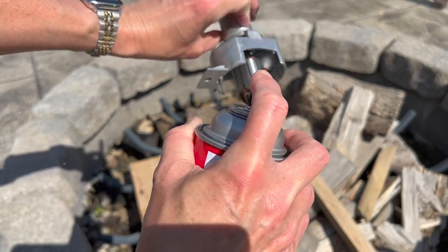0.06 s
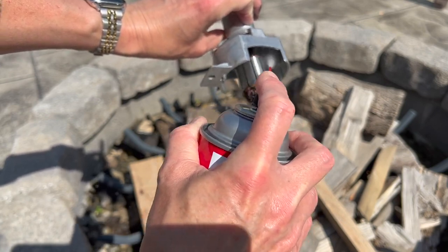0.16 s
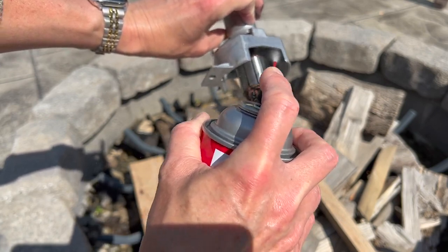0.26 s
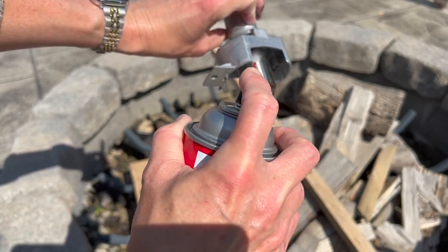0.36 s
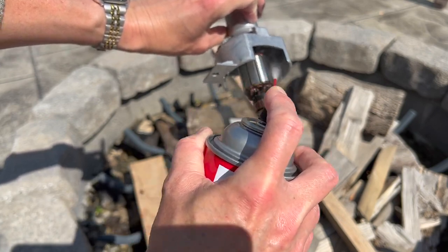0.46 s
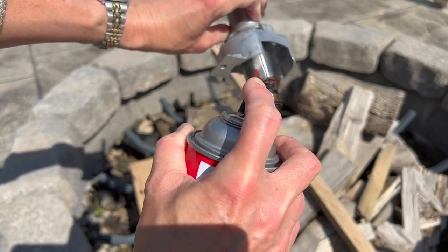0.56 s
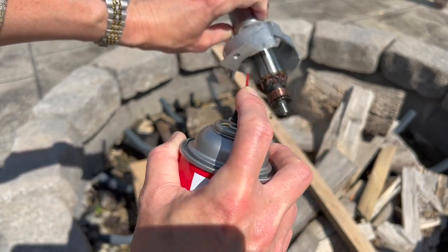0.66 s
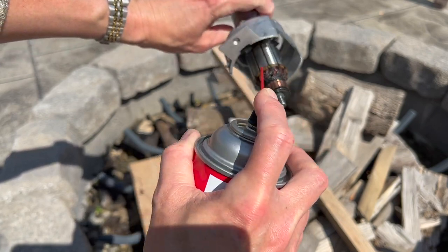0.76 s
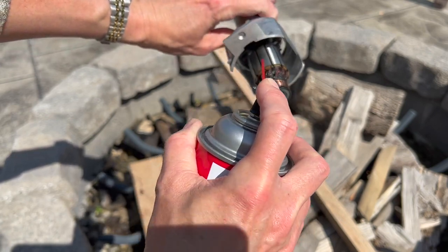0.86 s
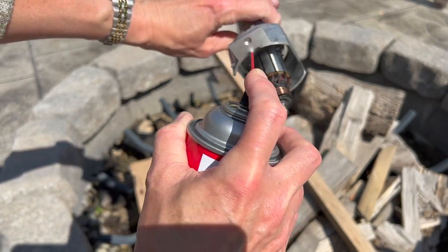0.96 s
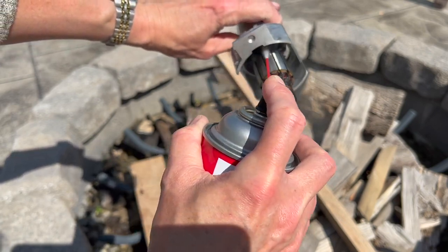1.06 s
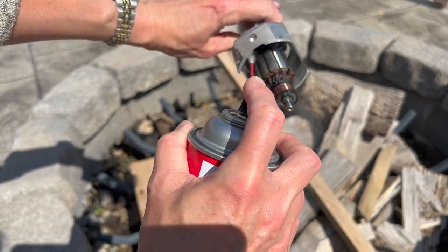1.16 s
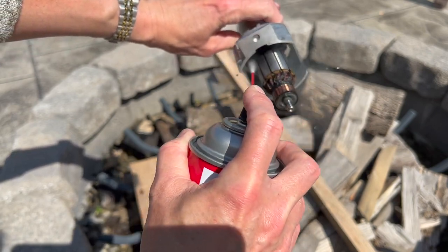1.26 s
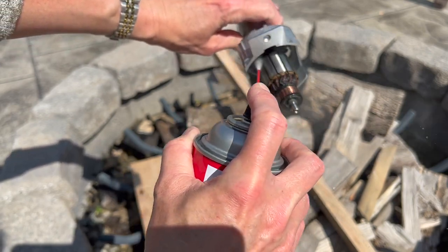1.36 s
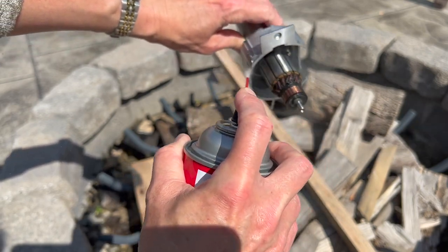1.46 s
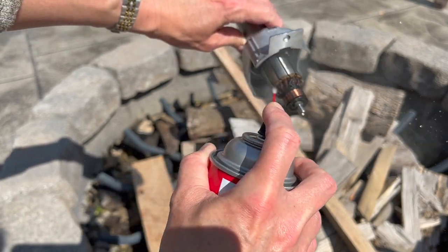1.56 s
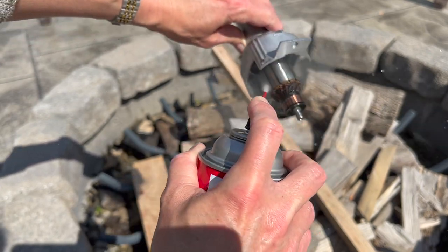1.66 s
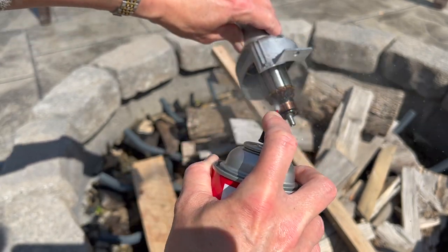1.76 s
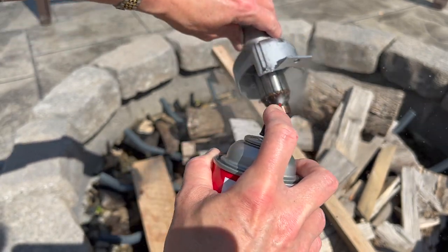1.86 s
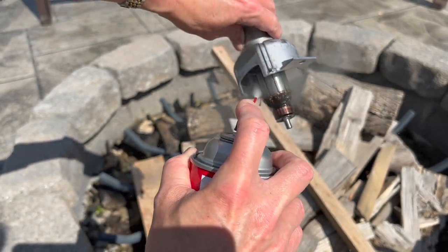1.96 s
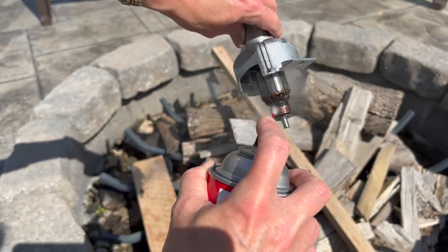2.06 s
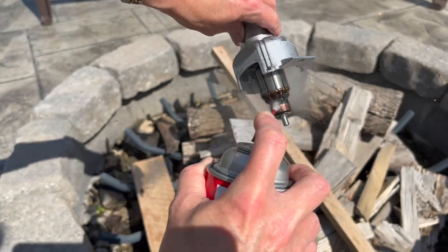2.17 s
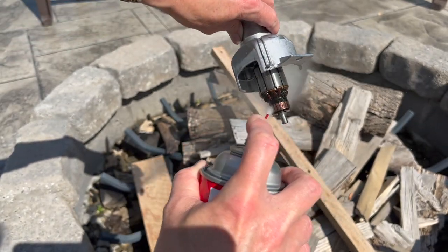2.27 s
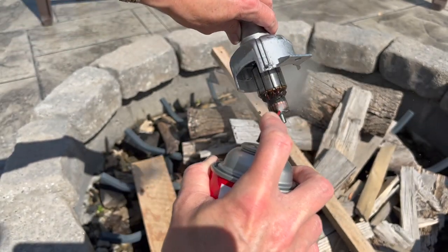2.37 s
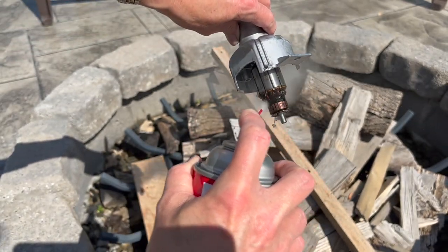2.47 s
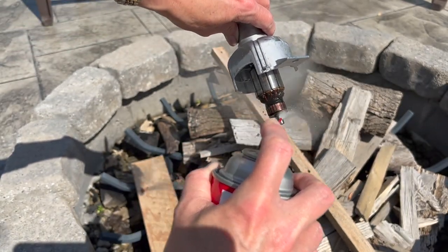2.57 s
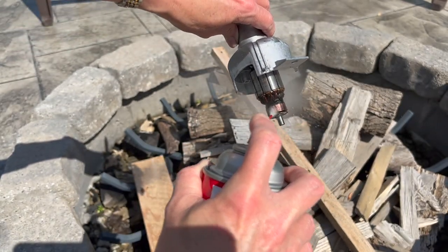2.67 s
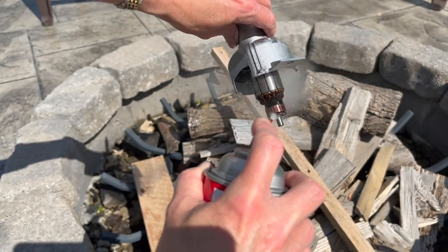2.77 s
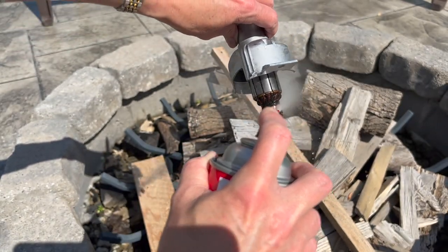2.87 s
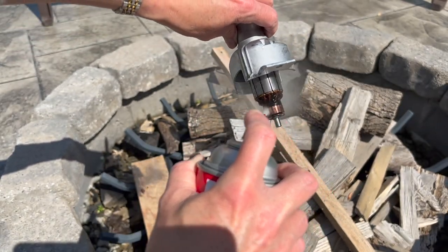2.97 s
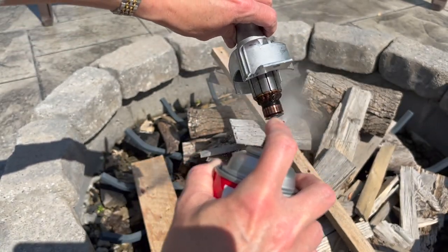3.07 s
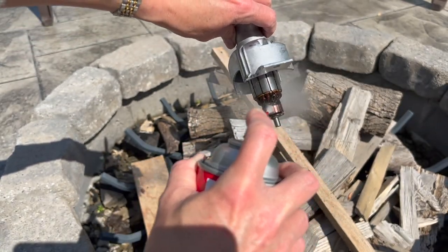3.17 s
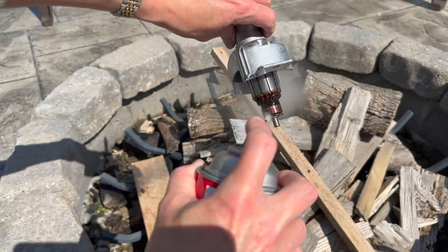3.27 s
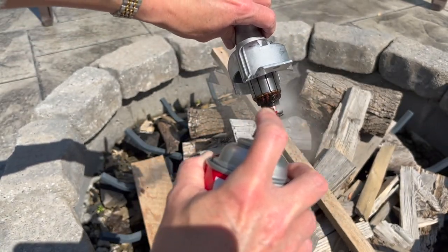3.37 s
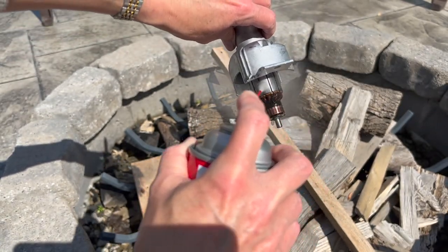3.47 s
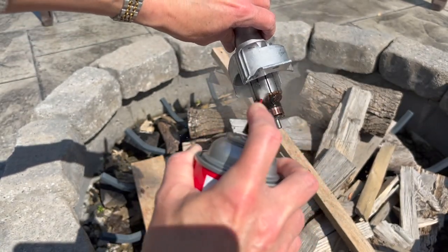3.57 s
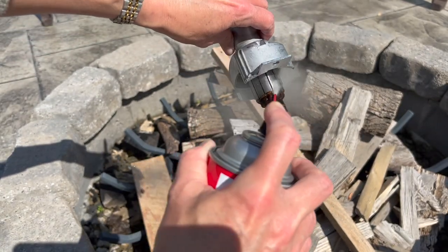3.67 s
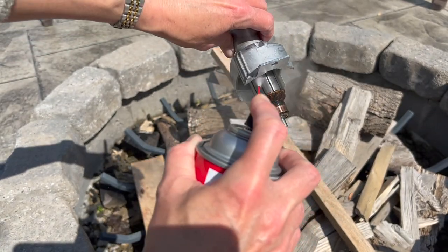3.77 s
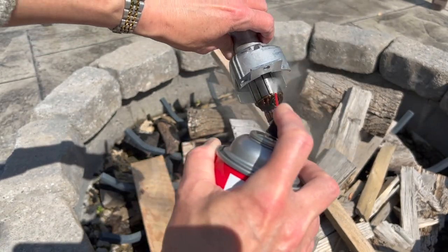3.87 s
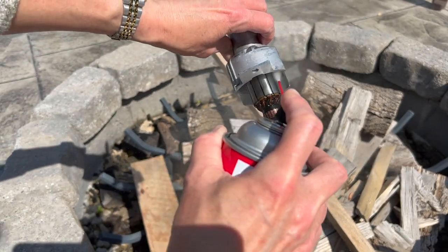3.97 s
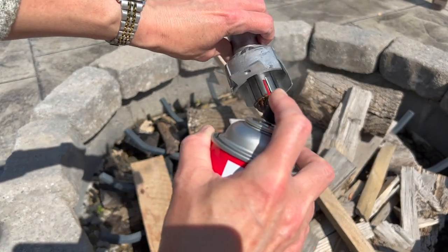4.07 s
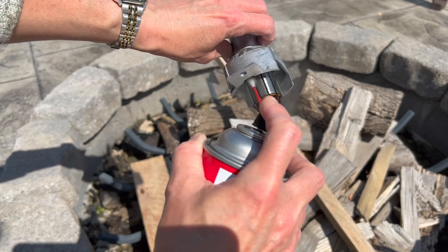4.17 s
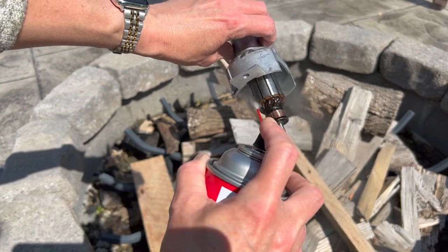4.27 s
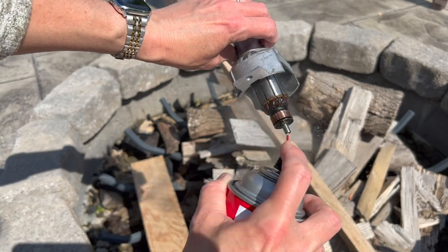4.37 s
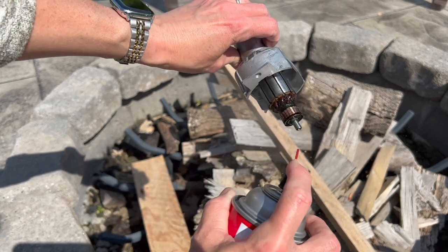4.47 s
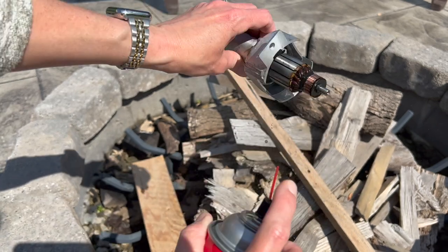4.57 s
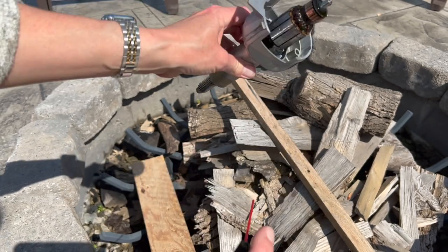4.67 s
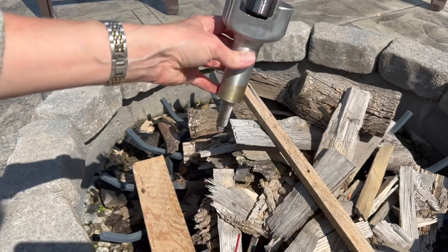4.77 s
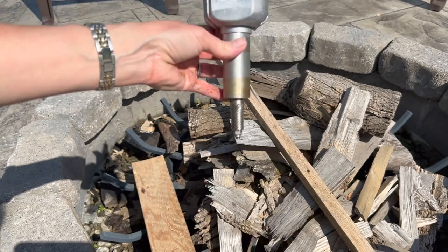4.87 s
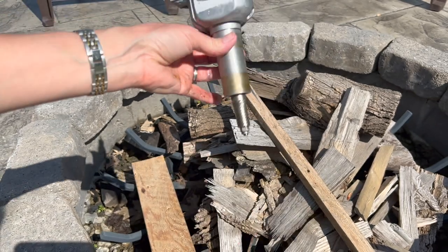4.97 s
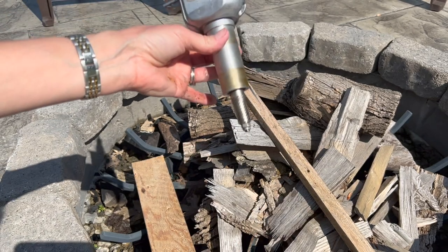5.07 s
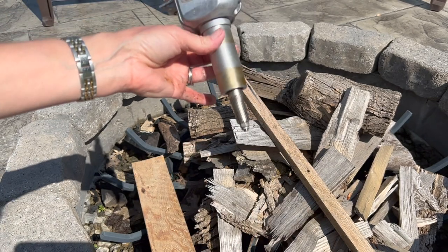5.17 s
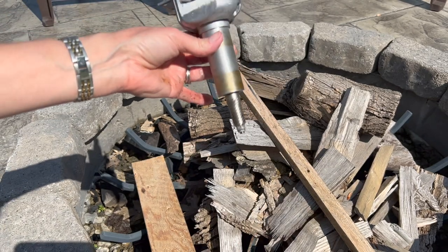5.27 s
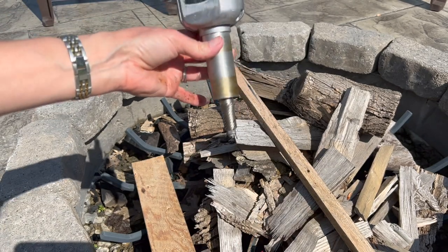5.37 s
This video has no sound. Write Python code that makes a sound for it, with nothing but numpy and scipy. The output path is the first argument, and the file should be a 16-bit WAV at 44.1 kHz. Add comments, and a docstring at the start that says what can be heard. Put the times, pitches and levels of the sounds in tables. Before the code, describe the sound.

Close outdoor stereo sound of an aerosol jet hitting a small hollow metal part. From 0 to 0.7 s a moderate bright hiss with wet splash, flickering with a bottle-like hoot near 900 Hz and airy whistles around 7 kHz. It cuts quickly; a faint metallic ring and several tiny plastic ticks fill the gap from 0.8 to 0.92 s. At about 0.95 s the spray returns suddenly, loudest, spitting liquid, with breathy pocket tones until 1.6 s and heavy low air thumps at 1.1-1.35 s. It eases into a thinner, steadier hiss through 3.4 s, with a brief bird warble near 2.65 s and softer thumps around 3.05 s. Hollow tones strengthen again around 4 s. The valve shuts at 4.4 s; a clear cap tick at 4.5 s and a short gas spit at 4.6 s follow. Quiet low rumble remains, with quick gliding bird warbles at 4.73 and 5.3 s, lightly echoed by stone.

```python
"""Aerosol spray on a motor part

An aerosol can sprays a small motor part over a stone fire pit, close by: a short burst, a pause, a long burst.
One flow drives shaped noise for hiss and splash, and ringing noise bands for the hollow housing, blown like a bottle.
The can rings, ticks and spits; puffs of air thump the microphone as short low swings.
A small bird warbles nearby in gliding tones, over a low outdoor rumble of filtered noise."""
import sys
import numpy as np
from scipy import signal
from scipy.fft import rfft, irfft, next_fast_len
from scipy.io import wavfile
from scipy.ndimage import uniform_filter1d, minimum_filter1d, map_coordinates

SR = 44100
rng = np.random.default_rng(int(sys.argv[2]) if len(sys.argv) > 2 else 0)


def digitize_waveform(pressure):
    """Quantize a signal to 16-bit integers and store it at the path in sys.argv[1].

    Rows of a 2-D input are taken as channels; values are limited to [-1, 1].
    """
    field = np.atleast_2d(pressure).T
    bounded = np.clip(field, -1, 1)
    quanta = np.round(bounded * 32767).astype(np.int16)
    wavfile.write(sys.argv[1], SR, quanta)


def field_ratio(decibels):
    """Amplitude ratio for a level in dB (20 dB per decade); scalars and array-likes work."""
    return 10 ** (np.asarray(decibels, dtype=float) / 20)


N = 239022
T = np.arange(N) / SR  # seconds

# The hand's slow control of the jet. Each row: time in seconds, flow in dB,
# how squarely the jet meets the metal in dB, hollow note in Hz as the part is turned.
AIM_PATH = [(0, -32.5, 3, 912), (.3, -30.5, 3.5, 929), (0.599, -31, 1.5, 910), (0.677, -37.5, 5.5, 900),
            (.7, -45.5, 4, 898), (1.0, -22.5, -3.5, 911.5), (1.3, -25.5, -2, 873), (1.55, -27, -0.5, 879),
            (1.85, -28, 0, 880), (2.1, -30, 3, 880), (2.7, -32, 4, 888), (3.4, -32.5, 4.5, 900),
            (3.5, -29.5, 2.5, 887), (3.88, -29, 1.5, 900), (3.95, -34, 7.5, 915), (4.05, -28.5, 2, 911),
            (4.301, -30, 1.5, 900), (4.39, -34.5, 3, 900)]
# Sputters as slugs of liquid leave the straw. Each row: peak time in seconds, extra flow in dB,
# length in seconds that scales the rise and the fall.
LIQUID_SLUGS = [(0.954, 5, .006), (0.997, 5, .005), (1.007, 4, .004), (1.034, 6, 0.0065), (1.399, 7, 0.008),
                (1.465, 6.5, 0.0037), (1.588, 3.5, 0.011), (1.76, 3.5, 0.018), (2.03, 1.5, .015),
                (2.576, 4, 0.016), (4.274, 3.5, 0.0052)]
# The jet glances off an edge. Each row: middle in seconds, half length in seconds, rise of the hiss in dB,
# relative whistle level in dB, whistle pitch in Hz.
EDGE_GLANCES = [(.13, .03, 2.5, -8.5, 7300), (.43, 0.021, 7.5, 3.5, 7800), (.56, 0.038, 3, 2, 7650),
                (1.007, .009, 4, 15.5, 6440), (1.12, 0.055, 1.5, -2.5, 7200), (1.23, 0.054, 0, 1.5, 7224),
                (1.36, .03, 2.5, 4, 6770), (1.43, .015, 2.5, -9.5, 7220), (1.6, 0.017, 8.5, 5.5, 7400),
                (1.655, 0.025, 8, 0.5, 7800), (1.91, 0.016, 7, 1.5, 7140), (1.95, 0.015, 7.5, 0.5, 7600),
                (2.33, 0.027, 2.5, -21.5, 7450), (2.56, 0.011, 3, -5.5, 7400), (2.8, 0.018, 7, -10, 6690),
                (3.02, .012, 5, -12.5, 7800), (3.31, 0.026, 5.5, -13, 6910), (3.52, .055, 3.5, 7.5, 7700),
                (3.59, 0.012, 3.5, -2.5, 7400), (3.79, 0.04, 2, 4, 7680), (3.86, 0.031, 3.5, 4, 7740),
                (4.11, 0.047, 5, -5, 7090), (4.18, 0.013, 3.5, 7, 7860), (4.28, 0.018, 3.5, 5.5, 6820),
                (4.36, 0.016, 3.5, -6.5, 7650)]
# The jet blows across an opening. Each row: middle in seconds, half length in seconds,
# then relative levels in dB of the hollow note, the large pockets and the small pockets.
BLOWN_OPENINGS = [(0, 0.034, 5.5, 4.5, 5.5), (.14, 0.093, 5.5, 2, -7), (.325, 0.028, 15.5, 12.5, 6.5),
                  (.37, 0.022, 5.5, -3, 9), (.49, 0.022, 7.5, 3.5, -2), (1.04, 0.029, 6.5, 1.5, 10),
                  (1.13, 0.047, 8, 5, 6), (1.2, 0.026, 0.5, 5.5, 16.5), (1.27, .035, 15, 10, 13.5),
                  (1.4, 0.02, 9.5, 11.5, 10.5), (1.46, 0.014, 9, 12.5, 8), (1.51, 0.023, 11.5, 16, 12.5),
                  (1.55, 0.014, 10, 4.5, 4.5), (1.74, 0.03, 5, 5, 6.5), (2.05, 0.02, 2.5, 6, 8.5),
                  (2.8, 0.014, -15, 2, 8), (3.05, 0.014, -10, -7, 9.5), (3.33, 0.035, -2, -1.5, 9.5),
                  (3.55, 0.028, 2, -13, 2.5), (3.78, 0.022, 2.5, 9, 6.5), (3.85, 0.046, 4.5, -11, -4.5),
                  (3.96, 0.028, 11.5, 1, 1), (4.015, 0.027, 16.5, 9, 2), (4.07, 0.045, 6.5, 8, 9),
                  (4.22, .04, 10, 5, 1), (4.3, 0.047, 2.5, -5.5, 8)]
# Between passes: relative levels in dB of the hollow note, large pockets, small pockets and whistle.
IDLE_LEVELS = [-10.5, -3.5, -1.5, -10]
# Colour of the hissing jet. Each row: frequency in Hz, relative density in dB.
JET_COLOUR = [(1500, -34), (3000, -5.5), (4400, -8), (5000, -11.5), (5800, -4), (7000, -6.5), (9000, -4.5),
              (12000, -1), (15000, -2), (15700, 1.5), (15900, -29.5)]
# Colour of the splash. Each row: frequency in Hz, relative density in dB.
SPLASH_COLOUR = [(120, -33.5), (220, -9), (400, -4), (700, 0), (1250, -6), (1600, -6), (2500, -10),
                 (4000, -8.5), (6000, -30)]
# Resonances of the wetted metal that colour the splash. Each row: centre in Hz, width in Hz, level in dB.
METAL_MODES = [(740, 110, -12.5), (1227, 300, 3.5), (2500, 180, 1), (2850, 200, -5), (3300, 300, -8),
               (4770, 260, 6.5)]
# Resonances of the large pockets of the housing. Each row: centre in Hz, width in Hz, relative level in dB.
LARGE_POCKETS = [(1410, 680, -10.5), (1890, 330, 1), (2114, 190, 2.5), (2487, 247, 1.5), (2970, 680, -4.5),
                 (5160, 150, -12)]
# Resonances of the small pockets. Each row: centre in Hz, width in Hz, relative level in dB.
SMALL_POCKETS = [(2426, 450, -3), (2830, 560, -1), (3814, 480, 0), (4280, 100, -3), (5060, 300, -5.5)]
# Stereo likeness of the spray noise. Each row: frequency in Hz, left-right correlation from 0 to 1.
SPRAY_LIKENESS = [(100, .92), (600, .92), (1600, .85), (2200, .96), (2900, .96), (4400, .82), (5700, .5),
                  (6600, .97), (9000, .99), (11500, .99), (14000, .93)]
# The can's shell rings on. Each row: start in seconds, pitch in Hz, starting level in dB, t60 in seconds.
SHELL_RINGS = [(.705, 2150, -59, 1.5), (.705, 12050, -64, .6), (4.4, 2150, -64, 1.2)]
# The plastic cap ticks. Each row: start in seconds, level in dB, lower pitch in Hz.
CAP_TICKS = [(0.804, -43, 2000), (0.8631, -46, 2352), (0.8887, -43, 1620), (0.913, -39, 2650),
             (4.4918, -30, 2505)]
# Left-over gas spits from the straw. Each row: start in seconds, starting level in dB, t60 in seconds.
GAS_SPITS = [(4.5985, -46, .09), (.912, -62, .1)]
# Puffs of air on the microphone. Each row: middle in seconds, level in dB, pitch at the middle in Hz,
# spread in seconds.
AIR_PUFFS = [(1.09, -22, 45, 0.012), (1.126, -16.5, 105, 0.0046), (1.156, -8, 67.1, 0.0096),
             (1.283, -14.5, 77.6, 0.0079), (1.335, -18, 112.4, 0.0046), (1.497, -28, 70, 0.012),
             (3.048, -16.5, 115, 0.0034), (3.094, -16, 81.5, 0.0076), (3.313, -31.5, 59.3, 0.016),
             (4.944, -40, 55.5, 0.017)]
# When the bird sings. Each row: time in seconds, gain in dB, fading through the warble in dB per second.
WARBLE_TIMES = [(2.639, 11, 50), (4.727, 2, 0), (5.3, 0, 0)]
# One warble, two voices overlapping. Each row: start and end in seconds from the warble's time,
# first, middle and last pitch in Hz, relative level in dB.
WARBLE_NOTES = [(-.026, -.003, 7200, 6800, 6300, -60), (-.014, -.004, 3700, 3900, 4100, -50),
                (-.003, .001, 2500, 3000, 3600, -54), (.001, .021, 3600, 4150, 4650, -40),
                (.005, .026, 4600, 4700, 4750, -41), (.023, .048, 4200, 3700, 3100, -37),
                (.038, .052, 3850, 4200, 4000, -43), (.052, .071, 2950, 2980, 3100, -31),
                (.07, .084, 3200, 3500, 3950, -40), (.08, .095, 3600, 3150, 2950, -38),
                (.095, .109, 3200, 2350, 2950, -35), (.11, .124, 2450, 2650, 3000, -50)]
# Early echoes off stone. Each row: delay in seconds, relative level in dB.
STONE_ECHOES = [(.0023, -17), (.0041, -14), (.0068, -16), (.0105, -22), (.016, -15), (.083, -17)]
# Tail of the yard. Each row: frequency in Hz, t60 in seconds.
YARD_DECAY = [(500, 0.78), (2400, .5), (3300, 0.83), (4500, 1.6), (6500, .5), (9000, .2)]
# Colour of the far rumble and hiss. Each row: frequency in Hz, relative density in dB.
AIR_COLOUR = [(15, -45.5), (30, -18), (60, 0), (120, -6), (250, -12.5), (624, -19), (1000, -25),
              (1890, -37), (3620, -43), (5880, -47.5), (7200, -46.5), (9500, -50.5), (12000, -48.5),
              (15700, -55.5), (15900, -92)]
# Stereo likeness of the far sound. Each row: frequency in Hz, left-right correlation from 0 to 1.
AIR_LIKENESS = [(60, .94), (200, .8), (400, .4), (800, 0), (1400, 0), (2400, .7), (6000, .75), (9000, .97)]
# The two microphone ports. Each row: frequency in Hz, lead of left in radians, left over right in dB.
MIC_PORTS = [(0, -.5, .4), (200, -.5, .3), (450, -.3, 1.5), (850, .6, -4.5), (1200, .5, 2), (1550, -.5, 1),
             (2200, .1, 0), (2900, .3, 0), (3600, 1.1, .5), (4650, 1.1, .5), (5340, 0, 1), (5700, -2.5, 1),
             (6500, -6.2, 0), (8250, -6.4, 0), (9150, -9.3, 0), (10600, -9.5, 0), (12600, -12.45, 0),
             (14500, -12.65, 0), (15800, -15.3, 0)]

FIRST_SHUT_S, FIRST_T60_S = .7, .045  # the valve shuts, the flow dies
REOPEN_S, LEAK_DB, OPENING_S = .93, -33, 0.018  # pressed again, flow at first touch, time constant of its rise
LAST_SHUT_S, LAST_T60_S = 4.395, .025
IDLE_WHISTLE_HZ = 7400  # between passes
SQUARENESS = 2.6  # 2 = round pass, more = flat top
GLANCE_STEALS, OPENING_ADDS = 0.23, 0.17  # dB of splash lost per dB of hiss, gained per dB of large-pocket ring
AIR_DB = -40
TOP_HZ = 15800  # top of the microphone's range


def unit(x):
    """Scaled to rms 1."""
    return x / np.sqrt(np.mean(x ** 2) + 1e-20)


def along(points, hz):
    """(Hz, value) points read on a log axis."""
    f, v = np.transpose(points)
    return np.interp(np.log(hz + 1), np.log(f + 1), v)


def wobble(rate):
    """A smooth random curve, rate knots a second."""
    return map_coordinates(rng.standard_normal(int(N * rate / SR) + 4), [T * rate])


def filtered(x, response):
    """x passed through a complex response of frequency."""
    m = next_fast_len(N + 8192)
    spectrum = rfft(x, m) * response(np.fft.rfftfreq(m, 1 / SR))
    return irfft(spectrum, m)[..., :N]


def modes(table):
    """Response of a set of (Hz, width, dB) resonances, with alternating signs."""
    def response(f):
        total = 0
        for k, (centre, width, db) in enumerate(table):
            damping = 1j * f * width
            total = total + (-1) ** k * field_ratio(db) * damping / (centre * centre - f * f + damping)
        return total
    return response


def rush(response, alike, patchy_db):
    """Turbulence: stereo noise of rms 1 with time-frequency patches of random gain."""
    z = signal.stft(rng.standard_normal((2, N)), nperseg=256)[2]
    field = rng.standard_normal(z.shape[1:])
    field = uniform_filter1d(uniform_filter1d(field, size=5, axis=0), size=10, axis=1)
    pair = signal.istft(z * field_ratio(patchy_db * unit(field)), nperseg=256)[1][:, :N]

    def spread(hz):
        angle = np.arccos(np.clip(along(alike, hz), -1, 1)) / 2
        return response(hz) * [np.cos(angle), np.sin(angle)]

    mid, side = filtered(pair, spread)
    return unit(np.array([mid + side, mid - side]))


def band(centre_hz, width_hz):
    """A breathy tone: narrow noise of rms 1 around a moving pitch."""
    slow = filtered(rng.standard_normal((2, N)), lambda f: 1 / (1 + 1j * f / width_hz) ** 2)
    phase = 2 * np.pi * np.cumsum(centre_hz) / SR
    return unit(slow[0] * np.cos(phase) + slow[1] * np.sin(phase))


def passes(table):
    """One swell from 0 to 1 and back for each row, on a coarse clock, and the row's other columns."""
    middle, half, *cols = np.transpose(table)
    distance = np.abs((T[::64] - middle[:, None]) / half[:, None])
    return np.exp(-.5 * distance ** SQUARENESS), cols


def fine(coarse):
    """A coarse control curve read at every sample."""
    return np.interp(T, T[::64], coarse)


def jet_flow(flow_db):
    """Flow through the straw: the hand's curve, the valve, slugs of liquid and a random flutter."""
    slugs_db = 0
    for at, db, length in LIQUID_SLUGS:
        # a slug arrives suddenly and thins out more slowly
        spread = np.where(T < at, 0.22 * length, 0.65 * length)
        slugs_db = slugs_db + db * np.exp(-.5 * ((T - at) / spread) ** 2)
    # the flow collapses within a few hundredths of a second when the finger lifts
    first_shut_db = -60 * np.maximum(T - FIRST_SHUT_S, 0) / FIRST_T60_S
    last_shut_db = -60 * np.maximum(T - LAST_SHUT_S, 0) / LAST_T60_S
    opening_db = LEAK_DB * np.exp(-np.maximum(T - REOPEN_S, 0) / OPENING_S)
    valve_db = np.where(T < REOPEN_S, first_shut_db, last_shut_db + opening_db)
    flutter_db = 1.1 * wobble(24.77) + 0.45 * wobble(300)
    return field_ratio(flow_db + valve_db + slugs_db + flutter_db)


def spray():
    """One flow drives the hiss, the splash and the resonances of the part it strikes."""
    s, *cols = np.transpose(AIM_PATH)
    flow_db, square_db, hollow_hz = (np.interp(T, s, c) for c in cols)
    glance, (rise_db, whistle_db, whistle_hz) = passes(EDGE_GLANCES)
    blown, ring_db = passes(BLOWN_OPENINGS)

    hollow_gain, deep_gain, high_gain = (
        fine(field_ratio(idle) + field_ratio(db) @ blown) for idle, db in zip(IDLE_LEVELS, ring_db))
    edge_gain = fine(field_ratio(IDLE_LEVELS[-1]) + field_ratio(whistle_db) @ glance)
    hiss_db = fine(rise_db @ glance)
    # the idle pitch has a small weight, so a glance takes the whistle over
    edge_hz = fine((.05 * IDLE_WHISTLE_HZ + whistle_hz @ glance) / (.05 + glance.sum(axis=0)))
    pocket_ring = deep_gain / field_ratio(IDLE_LEVELS[1])
    splash_gain = field_ratio(square_db - GLANCE_STEALS * hiss_db) * pocket_ring ** OPENING_ADDS

    def splash_response(f):
        return field_ratio(along(SPLASH_COLOUR, f)) * (1 + np.abs(modes(METAL_MODES)(f)))

    flow = jet_flow(flow_db)
    hiss = field_ratio(hiss_db + 5.0) * rush(lambda f: field_ratio(along(JET_COLOUR, f)), SPRAY_LIKENESS, patchy_db=3.0)
    splash = splash_gain * field_ratio(3.0) * rush(splash_response, SPRAY_LIKENESS, patchy_db=1.7)
    deep = deep_gain * field_ratio(-3) * rush(modes(LARGE_POCKETS), SPRAY_LIKENESS, patchy_db=1.1)
    high = high_gain * field_ratio(-7.5) * rush(modes(SMALL_POCKETS), SPRAY_LIKENESS, patchy_db=4.0)
    # both notes follow the aim of the straw
    edge = edge_gain * field_ratio(-3) * band(edge_hz, width_hz=500)
    hollow = hollow_gain * field_ratio(-5.5) * band(hollow_hz, width_hz=45.0)
    return flow * (hiss + splash + deep + high + edge + hollow)


def shell():
    """The shell rings on after the valve shuts: narrow noise bands that die away."""
    out = np.zeros(N)
    for at, hz, db, t60 in SHELL_RINGS:
        t = np.maximum(T - at, 0)
        out += field_ratio(db - 60 * t / t60) * band(np.full(N, hz), width_hz=22) * (t > 0)
    return out


def cap_ticks():
    """The plastic cap ticks under the finger: two quick tones and a crack of noise."""
    out = np.zeros(N)
    crack = filtered(rng.standard_normal(N), lambda f: modes([(3200, 3500, 0)])(f) ** 2)
    for at, db, hz in CAP_TICKS:
        t = np.maximum(T - at, 0)
        tones = np.sin(2 * np.pi * hz * t) + .8 * np.sin(2 * np.pi * 1.45 * hz * t)
        envelope = field_ratio(db - 60 * t / .012) * (1 - np.exp(-t / .0004))
        out += envelope * (tones + .7 * crack)
    return out


def spits():
    """Left-over gas spits from the straw: bright noise that starts at once and dies away."""
    colour = modes([(5800, 4000, 0), (12200, 2000, -9)])
    gas = unit(filtered(rng.standard_normal(N), lambda f: colour(f) ** 2))
    return gas * sum(field_ratio(db - 60 * np.maximum(T - at, 0) / t60) * (T > at) for at, db, t60 in GAS_SPITS)


def puffs():
    """Each puff pushes the diaphragm for a cycle or two, falling in pitch, with eddies around it."""
    eddies = unit(filtered(rng.standard_normal(N), modes([(129, 480, 0)])))
    out = np.zeros(N)
    for at, db, hz, length in AIR_PUFFS:
        t = T - at
        push = np.cos(2 * np.pi * hz * t * (1 - 6 * t) - .7)
        out += field_ratio(db) * np.exp(-.5 * (t / length) ** 2) * push
        out += field_ratio(db - 17.5) * np.exp(-.5 * (t / (2.1 * length)) ** 2) * eddies
    return out


def bird():
    """The same run of gliding notes each time, slightly varied and hoarse, with a breathy octave."""
    out = np.zeros(N + SR)
    waver, flutter, smear = wobble(250), wobble(350), wobble(1400)
    for at, call_db, fade_db in WARBLE_TIMES:
        variations = rng.standard_normal((len(WARBLE_NOTES), 2))
        for (start, end, *hz, db), (detune, size) in zip(WARBLE_NOTES, variations):
            first = round((at + start) * SR)
            u = np.linspace(-1, 1, round((end - start) * SR))
            now = np.minimum(first + np.arange(len(u)), N - 1)
            glide = np.polyval(np.polyfit([-1, 0, 1], hz, 2), u)
            pitch = glide * (1 + .008 * detune + .007 * waver[now])
            phase = 2 * np.pi * np.cumsum(pitch) / SR
            clear = np.clip((6000 - pitch) / 1000, .2, 1)  # the highest notes are mostly breath
            note = (clear + (1.06 - clear) * smear[now]) * np.sin(phase)
            note += field_ratio(-24) * smear[now] * np.sin(2 * phase)
            level_db = db + call_db - fade_db * start + 1.2 * size + 1.4 * flutter[now]
            out[first:][:len(u)] += field_ratio(level_db) * (1 - u ** 6) * note
    return out[:N]


def walls(x):
    """A few early echoes off stone, alternating sides, strongest around 3750 Hz."""
    x = filtered(x, modes([(3750, 3800, 0.0051)]))
    out = np.zeros((2, N))
    for k, (delay_s, db) in enumerate(STONE_ECHOES):
        side_db = 2.5 * (-1) ** k * np.array([[1], [-1]])
        out += field_ratio(db + side_db) * np.pad(x, (round(delay_s * SR), 0))[:N]
    return out


def yard(x, tail_db):
    """A diffuse tail of noise that builds up and then dies at its own rate at each frequency."""
    hz, t, z = signal.stft(rng.standard_normal((2, SR)), SR, nperseg=256)
    decay = field_ratio(-60 * t / along(YARD_DECAY, hz)[:, None])
    tail = signal.istft(z * decay * (1 - np.exp(-t / .03)), SR, nperseg=256)[1]
    tail = field_ratio(tail_db) * tail / np.linalg.norm(tail[0])
    return signal.fftconvolve(x[None], tail, axes=1)[:, :N]


def air():
    """Far rumble and hiss: shaped noise that swells gently."""
    far = lambda f: field_ratio(along(AIR_COLOUR, f))
    return field_ratio(AIR_DB + 0.32 * wobble(5.4)) * rush(far, AIR_LIKENESS, patchy_db=1.5)


def scene():
    """All sources at the microphone; far stone returns only the lower part of the spray."""
    song, jet = bird(), spray()
    # the bird sits a little to the left
    birds = song * field_ratio([[1.5], [-1.5]]) + walls(song) + yard(song, tail_db=-14.5)
    dull = filtered(jet[0], lambda f: 1 / (1 + 1j * f / 3000) ** 2)
    can = shell() + cap_ticks() + spits()
    return jet + yard(dull, tail_db=-30) + can + puffs() + birds + air()


def top_cut(x):
    """Nothing passes above the cut-off."""
    return signal.sosfilt(signal.butter(12, 16320, fs=SR, output="sos"), x)


def record(dry):
    """Each microphone port has its own phase and colour; a quick limiter holds the peaks."""
    hz, lead, tilt_db = np.transpose(MIC_PORTS)

    def ports(f):
        # each port takes half of the difference
        half = field_ratio(np.interp(f, hz, tilt_db) / 2) * np.exp(.5j * np.interp(f, hz, lead))
        return np.array([half, 1 / half]) * (f < TOP_HZ)

    x = filtered(dry, ports)
    need = np.minimum(1, .97 / (np.abs(x).max(axis=0) + 1e-9))
    gain = uniform_filter1d(minimum_filter1d(need, size=401), size=201)
    return top_cut(x * gain)


dry = scene()
out = record(dry)
digitize_waveform(out)
```